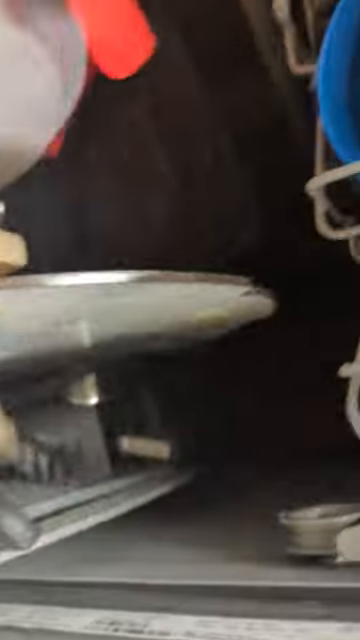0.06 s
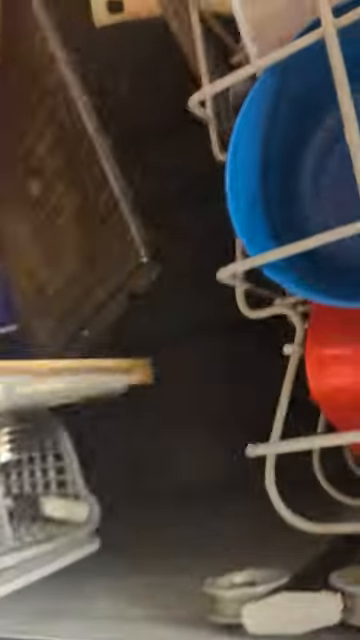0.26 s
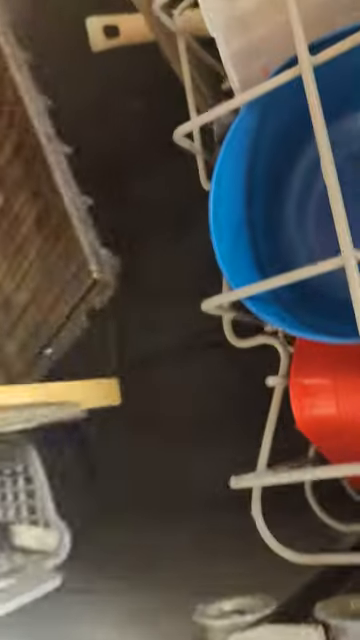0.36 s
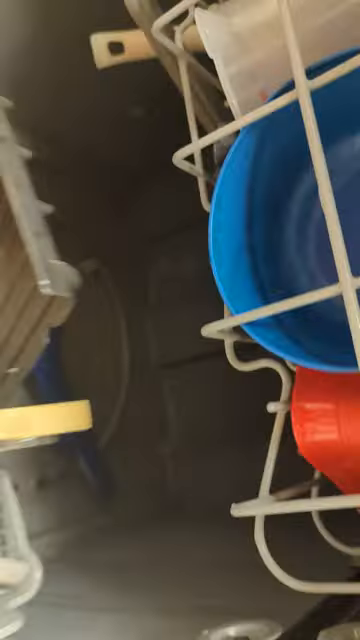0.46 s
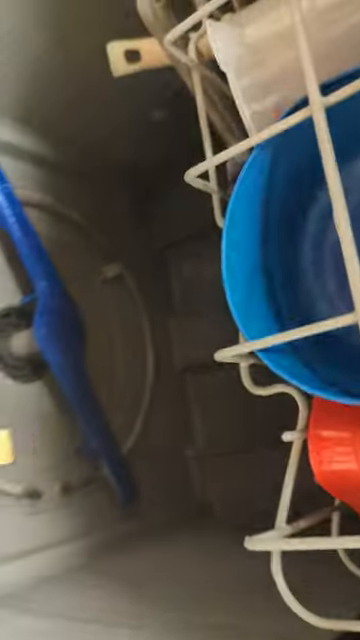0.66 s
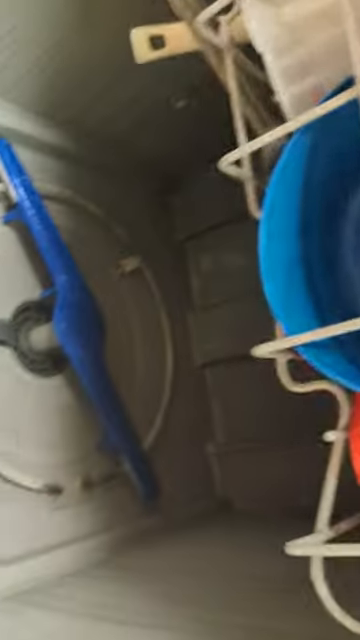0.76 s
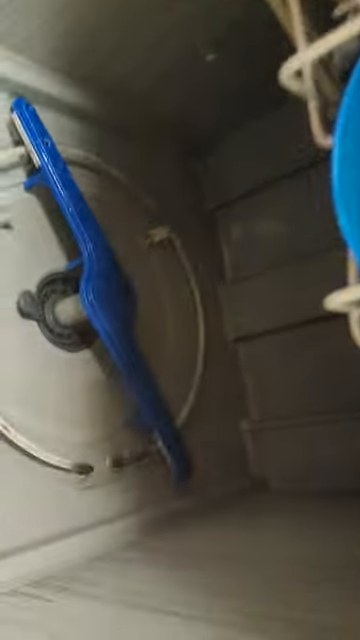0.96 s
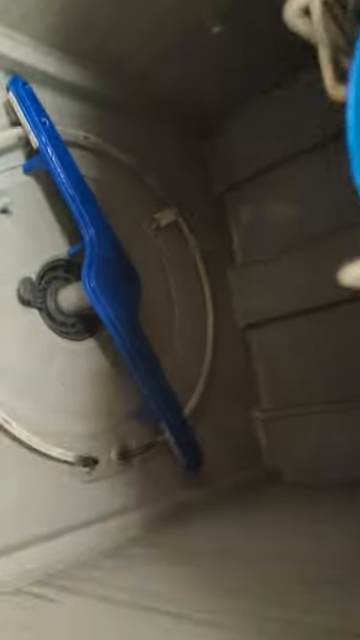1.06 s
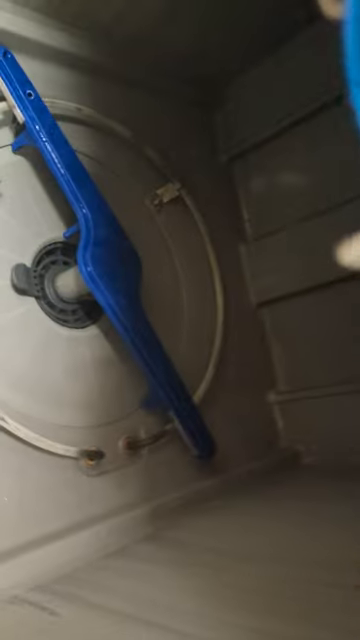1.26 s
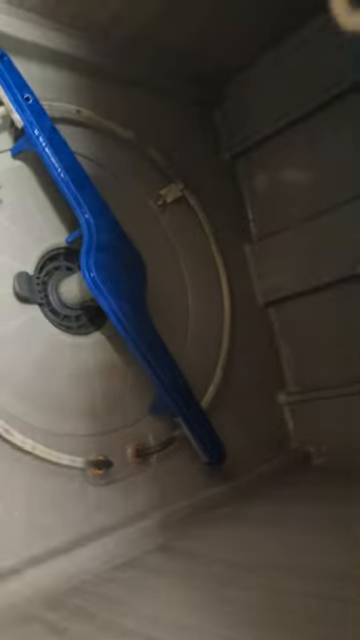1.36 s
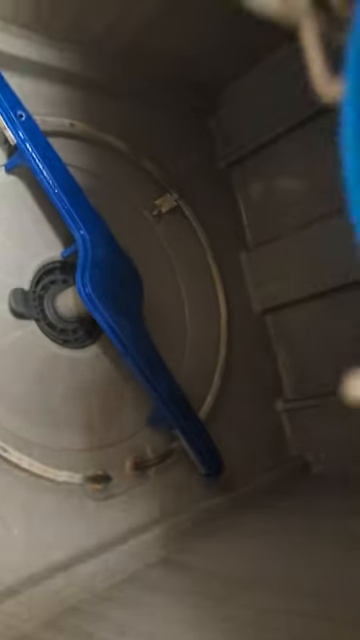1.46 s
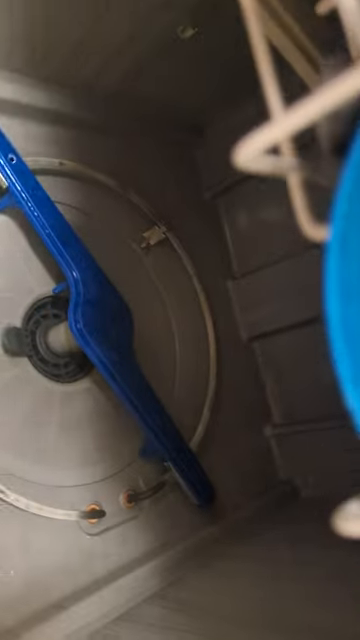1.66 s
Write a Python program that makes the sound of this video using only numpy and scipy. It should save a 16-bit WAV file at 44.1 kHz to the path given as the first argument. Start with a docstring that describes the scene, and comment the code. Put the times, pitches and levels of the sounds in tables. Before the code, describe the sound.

Dishes and cutlery clatter in two quick bursts as a dishwasher rack is pushed.

```python
"""A quiet room, a stereo microphone close to a dishwasher, the load a little to the right.
The loaded rack is shoved twice inside its tub. It rolls briefly on its rail, and each shove sets off a
quick run of knocks: dishes and wire rack ring, cutlery clinks and the thin tub walls boom.
Light rattles lie between the shoves, over a low rumble."""
import sys
import numpy as np
from scipy import signal
from scipy.io import wavfile

SR = 44100
rng = np.random.default_rng(int(sys.argv[2]) if len(sys.argv) > 2 else 0)


def transcribe(u):
    """Save the signal u as a 16-bit wav file named by the first command-line argument.

    u: samples, shape (n,) or (channels, n), limited to [-1, 1]; the rate is SR.
    q: integer samples, one column per channel.
    """
    v = np.clip(np.atleast_2d(u).T, -1, 1)
    q = np.round(v * 32767).astype(np.int16)
    wavfile.write(sys.argv[1], SR, q)


N = 74970
TIME = np.arange(N) / SR
OPPOSED = np.array([[.5], [-.5]])  # splits a difference between left and right


def from_db(db):
    """Decibels to gain."""
    return 10 ** (np.asarray(db) / 20)


def unit_rms(x):
    """Scale to unit rms."""
    return x / np.sqrt(np.mean(x ** 2) + 1e-20)


def at_hz(points, hz):
    """Read a table on a log-frequency axis."""
    freqs, values = np.transpose(points)
    return np.interp(np.log(hz), np.log(freqs), values)


def strike(start_s, t60_s, attack_s=0.0026):
    """Envelope of one blow: quick rise, exponential decay."""
    age = np.maximum(TIME - start_s, 0)
    return (1 - np.exp(-age / attack_s)) * np.exp(-np.minimum(np.log(1000) * age / t60_s, 20))


# Balance at the microphone: freq_hz, left_minus_right_db
MIC_BALANCE = [(100, -0.75), (300, 0.2), (1000, -2), (3000, -4), (9000, -4)]
def pan(hz):
    """Left and right gains: the load sits a little to the right."""
    return from_db(at_hz(MIC_BALANCE, hz) * OPPOSED)


# How alike the microphone's two sides are: freq_hz, correlation
MIC_LIKENESS = [(300, 0.99), (600, 0.95), (1200, 0.87), (2500, 0.68), (5000, 0.42), (9000, 0.011),
                (14000, 0.98)]
def bands(colour):
    """Stereo noise in third octaves, total power about one: yields (hz, band)."""
    edges = 20 * 2 ** np.arange(0, 9.8, 1 / 3)
    centres = np.sqrt(edges[1:] * edges[:-1])
    power = from_db(at_hz(colour, centres)) ** 2 * np.diff(edges)
    white = rng.standard_normal((2, 2, N + SR // 2))
    for k, hz in enumerate(centres):
        sos = signal.butter(2, edges[k:k + 2], "band", fs=SR, output="sos")
        mid, side = unit_rms(signal.sosfilt(sos, white[k % 2])[:, -N:])
        alike = at_hz(MIC_LIKENESS, hz)
        stereo = np.sqrt(1 + alike) * mid + np.sqrt(1 - alike) * side * [[1], [-1]]
        yield hz, np.sqrt(power[k] / power.sum() / 2) * pan(hz) * stereo


def chatter(per_s=750, spread_db=6.5, t60_s=0.025, rise_s=0.000077):
    """Tiny random rebounds roughen a contact: a lumpy gain of rms one."""
    rebounds = rng.random(N) < per_s / SR
    kicks = rebounds * from_db(spread_db * np.minimum(rng.exponential(1, N), 2)) ** 2
    power = signal.lfilter([1], [1, -from_db(-60 / (t60_s * SR)) ** 2], kicks)
    pole = np.exp(-2 / (rise_s * SR))
    return unit_rms(signal.lfilter([1], [1, -2 * pole, pole ** 2], np.sqrt(power + power.mean())))


def ringing(blows, modes):
    """Every blow starts all modes of a body at once; high modes reach the two sides out of step."""
    out = np.zeros((2, N))
    for start_s, db in blows:
        for k, (hz, mode_db, t60_s) in enumerate(modes):
            phase = np.arccos(at_hz(MIC_LIKENESS, hz)) * rng.choice([-1, 1]) * OPPOSED
            tone = (-1) ** k * np.sin(2 * np.pi * hz * (TIME - start_s) + phase)
            out += from_db(db + mode_db) * pan(hz) * strike(start_s, t60_s) * tone
    return out


def trembling(modes, width_hz):
    """Loose metal is touched over and over, so its resonances waver."""
    out, radius = 0, np.exp(-np.pi * width_hz / SR)
    for hz, db in modes:
        poles = [1, -2 * radius * np.cos(2 * np.pi * hz / SR), radius ** 2]
        ring = signal.lfilter([1, 0, -1], poles, rng.standard_normal((2, N + SR // 2)))
        out += from_db(db) * pan(hz) * unit_rms(ring[:, -N:])
    return out


# Reverberation inside the tub: freq_hz, t60_s
TUB_DECAY = [(200, 1), (800, 0.64), (2500, 0.52), (6000, 0.31), (14000, 0.28)]
def in_tub(starts, band_db, colour, t60_s, tail_db, crack_db=-3):
    """Each contact cracks, excites a dense cloud of short modes, then dies away in the tub."""
    clouds = np.array([strike(s, t60_s) ** 2 for s in starts])
    cracks = np.array([(from_db(crack_db) * strike(s, t60_s=0.01)) ** 2 for s in starts])
    out, rough = 0, chatter()
    for hz, noise in bands(colour):
        strength = from_db(band_db(hz)) ** 2
        power = strength @ clouds
        feedback = np.exp(-2 * np.log(1000) / (at_hz(TUB_DECAY, hz) * SR))
        tail = signal.lfilter([2 * np.log(1000) / (t60_s * SR)], [1, -feedback], power)
        out += noise * np.sqrt(strength @ cracks + power * rough ** 2 + tail * from_db(tail_db) ** 2)
    return out


# The room behind the machine: freq_hz, density_db
ROOM_SPECTRUM = [(22, 1), (60, 1), (95, -6.5), (160, -13.5), (270, -11.5), (400, -21.5), (750, -25.5),
                 (1000, -31), (4000, -49.5), (8000, -69), (15000, -74.5)]
def room_tone():
    """Steady low rumble and faint hiss."""
    return from_db(-48.5) * sum(noise for _, noise in bands(ROOM_SPECTRUM))


# Wheels on the rail: freq_hz, density_db
WHEEL_SPECTRUM = [(100, 9.5), (700, -4), (1400, -11), (4000, -16), (15000, -44.5)]
# Rack wire resonances: pitch_hz, level_db
WIRE_MODES = [(2175, 2.5), (2950, -1.5), (3709, -3.5), (5486, -10), (7000, -8)]
def rolling(end_s=0.21, fade_s=0.0081):
    """Wheels run along the rail and keep the wires trembling until the first loud knocks."""
    moving = .5 - .5 * np.tanh((TIME - end_s) / fade_s)
    wheels = from_db(-43) * np.sqrt(chatter()) * sum(noise for _, noise in bands(WHEEL_SPECTRUM))
    wires = from_db(-60) * trembling(WIRE_MODES[:3], width_hz=3)
    return moving * (wheels + wires)


# Flicks on a rack wire: start_s, level_db
WIRE_FLICKS = [(1.038, -37), (1.176, -46)]
def wire_twangs(t60_s=0.057):
    """A flicked wire gives a short, rough twang."""
    return ringing(WIRE_FLICKS, [(hz, db, t60_s) for hz, db in WIRE_MODES]) * chatter()


# Blades in the second shove: start_s, pitch_hz, level_db
BLADE_NOTES = [(.98, 15200, -44), (1.018, 13200, -44.5)]
def blades():
    """Each thin blade sings one very high, unsteady note."""
    return sum(strike(s, t60_s=0.13) * trembling([(hz, db)], width_hz=42) for s, hz, db in BLADE_NOTES)


# A loose utensil's tap: start_s, level_db
UTENSIL_TAPS = [(.153, -43.5)]
# Its resonances: pitch_hz, level_db
UTENSIL_MODES = [(3246, 0), (5211, -2), (6019, -8.5), (6433, -3), (9254, -10.5)]
def utensil(t60_s=0.1):
    """A utensil rings as it chatters on its neighbour."""
    return ringing(UTENSIL_TAPS, [(hz, db, t60_s) for hz, db in UTENSIL_MODES]) * chatter()


# Bumps on the tub wall: start_s, level_db
WALL_BUMPS = [(0.221, -38), (.33, -27.5), (0.863, -25), (1.01, -28.5), (1.24, -38)]
# The boom from close by: freq_hz, density_db
BOOM_SPECTRUM = [(22, -6.5), (38, -3.5), (55, -17), (85, -8.5), (130, -22.5), (400, -62)]
# The wall's lowest mode: pitch_hz, level_db, t60_s
WALL_MODES = [(35, -1.5, 0.41)]
def tub_booms():
    """The thin walls answer each bump with a slow, deep boom and swing in their lowest mode."""
    power = sum((from_db(db) * strike(s, t60_s=0.27, attack_s=0.022)) ** 2 for s, db in WALL_BUMPS)
    rumble = sum(noise for hz, noise in bands(BOOM_SPECTRUM) if hz < 500)
    return from_db(-3.5) * np.sqrt(power) * rumble + ringing(WALL_BUMPS, WALL_MODES)


# Cutlery contacts: start_s, level_db, extra_ring_db
CLINKS = [(.106, -52.5, -24), (0.149, -51, -23), (0.218, -34.5, -7.5), (0.24, -31, -2.5),
          (0.354, -46.5, -25), (0.396, -55.5, 2), (0.5103, -62, -25), (0.532, -61.5, -32),
          (.913, -33, -14.5), (0.98, -43.5, 5.5), (1.055, -49, -31), (1.175, -57, -35.5),
          (1.259, -67.5, -9), (1.66, -77, -17)]
# Their ticks from close by: freq_hz, density_db
CLINK_SPECTRUM = [(1000, -22.5), (2200, 12), (5000, 4), (8000, 4), (11000, -16), (15000, -16)]
# Thin metal resonances: pitch_hz, level_db
CUTLERY_MODES = [(9090, -3), (9460, -15.5), (10850, -7.5), (12150, -4), (13330, -10), (15620, -12)]
def cutlery(gain_db=7.5):
    """Metal meets metal: a bright tick, then a short jingle."""
    starts, level_db, _ = np.transpose(CLINKS)
    ticks = in_tub(starts, lambda hz: gain_db + level_db, CLINK_SPECTRUM, t60_s=0.099, tail_db=-19)
    ring_power = sum((from_db(db + extra) * strike(s, t60_s=0.13)) ** 2 / 2 for s, db, extra in CLINKS)
    return ticks + np.sqrt(ring_power) * trembling(CUTLERY_MODES, width_hz=93)


# Single dishes or panels: start_s, pitch_hz, level_db
PINGS = [(.186, 663, -26), (0.2281, 458, -17), (.365, 3600, -27), (.604, 856, -36.5), (0.878, 3210, -17),
         (.908, 734, -12.5), (0.945, 5570, -24.5), (1.0, 1986, -25), (1.202, 1047, -37), (1.23, 263, -33.5),
         (1.41, 267, -43.5), (1.51, 100.9, -34)]
def pings(base_s=0.021, cycles=27, longest_s=0.095):
    """A dish or panel sounds one short note; low ones last longer, up to a limit."""
    out = 0
    for start_s, hz, db in PINGS:
        envelope = strike(start_s, t60_s=min(base_s + cycles / hz, longest_s))
        out += from_db(db) * pan(hz) * envelope * np.sin(2 * np.pi * hz * (TIME - start_s))
    return out


# Blows that set dishes and rack ringing: start_s, level_db
DISH_BLOWS = [(.228, -1.5)]
RACK_BLOWS = [(.865, -14), (.909, -1)]
# Their resonances: pitch_hz, level_db, t60_s
DISH_MODES = [(281, -27.5, 0.19), (358.7, -22, 0.064), (447.5, -13, 0.14), (779, -32.5, 0.15),
              (840, -31, 0.45), (1130, -25.5, 0.21), (1300, -30, 0.55), (1355, -19, 0.28),
              (1786, -36.5, 0.45), (2410, -32, 0.31)]
RACK_MODES = [(325, -13.5, 0.063), (504.3, -21.5, 0.25), (618, -26, 0.083), (791, -23, .25),
              (870, -24, 0.22), (1107, -23.5, 0.25), (1288, -28, 0.19), (3140, -38, 0.067),
              (4396, -32.5, 0.22)]
def load_ringing():
    """The dishes ring on after the first shove, the rack after the second."""
    return ringing(DISH_BLOWS, DISH_MODES) + ringing(RACK_BLOWS, RACK_MODES)


# Knocks close to the microphone: start_s, level_db, extra_bass_db, extra_treble_db
KNOCKS = [(0.027, -39, -21, -8), (0.185, -38.5, 0, -15), (0.207, -30.5, -2, 0.5), (0.214, -19, 3.5, -0.5),
          (0.227, -22.5, -8.5, 1), (0.238, -12.5, -23.5, -23.5), (0.249, -32.5, 14.5, 3),
          (0.263, -38, 0, 10), (0.308, -29, -2, -3), (0.332, -28.5, 2.5, 0), (0.363, -29.5, -3.5, -4.5),
          (0.407, -45.5, 15.5, -6.5), (0.458, -46.5, 7, -5), (0.576, -45.5, 12.5, -14),
          (0.601, -39.5, 0, -15), (.665, -55, 15, -13), (0.726, -50, 10, -16), (0.773, -53, 14.5, -23),
          (0.863, -29, 1, 2.5), (0.876, -27, 3.5, 4), (0.892, -23, 4.5, -1), (0.907, -19, -4, -0.5),
          (0.917, -27, 3.5, -6), (0.938, -33.5, -5, 6.5), (0.944, -28, 2.5, 8), (0.962, -28, 0, -10),
          (0.9975, -28.5, -52, 4), (1.037, -35, -4, 1), (1.05, -32.5, -2.5, -13),
          (1.073, -35.5, 3.5, -13.5), (1.141, -42.5, -8.5, -7.5), (1.201, -46, -15, -9.5)]
# Their shared tone: freq_hz, density_db
KNOCK_SPECTRUM = [(100, 4), (170, -6), (270, 3.5), (450, 2.5), (800, 2), (1300, -4), (1900, -6),
                  (3200, -10.5), (4700, -15.5), (6200, -27.5), (9000, -28.5), (15000, -46.5)]
def knocks(gain_db=5.5):
    """Dishes and rack knock together: heavy contacts have more bass, hard ones more treble."""
    starts, level_db, bass_db, treble_db = np.transpose(KNOCKS)

    def band_db(hz):
        bass = bass_db * at_hz([(400, 0.79), (750, 0.066)], hz)
        treble = treble_db * at_hz([(1200, 0.081), (3000, 1)], hz)
        dulling = 0.43 * np.minimum(treble_db, 0) * (hz > 6000)  # soft contacts lose more top
        return gain_db + level_db + bass + treble + dulling

    return in_tub(starts, band_db, KNOCK_SPECTRUM, t60_s=0.12, tail_db=-19.5)


def scene():
    """Everything that reaches the microphone."""
    load = knocks() + load_ringing() + pings() + cutlery() + utensil() + wire_twangs() + blades()
    return load + rolling() + tub_booms() + room_tone()


def record(dry):
    """The top is cut steeply above 15.9 kHz."""
    return signal.sosfilt(signal.ellip(12, .1, 90, 15900, fs=SR, output="sos"), dry)


dry = scene()
out = record(dry)
transcribe(out)
```